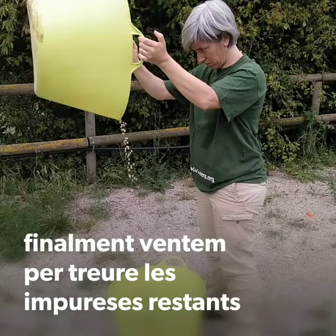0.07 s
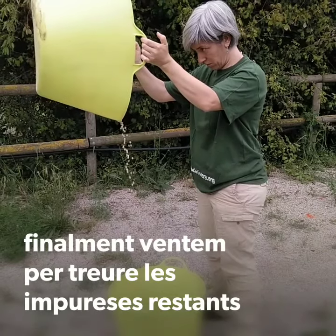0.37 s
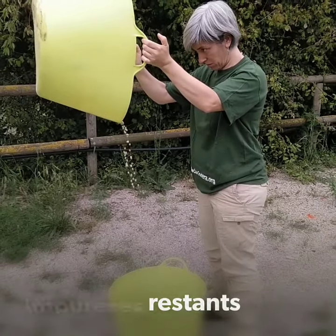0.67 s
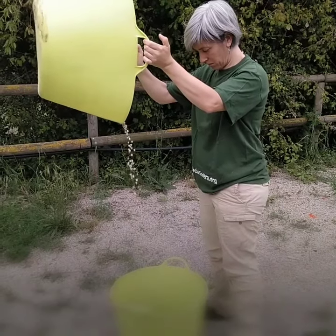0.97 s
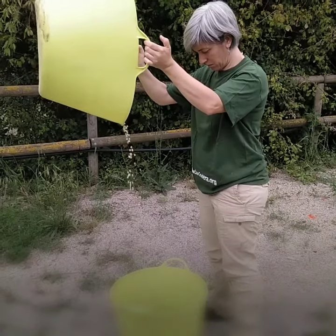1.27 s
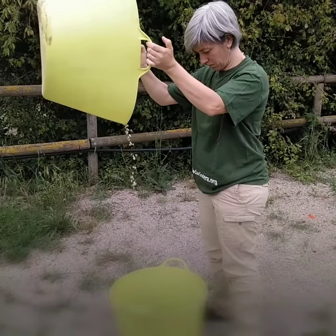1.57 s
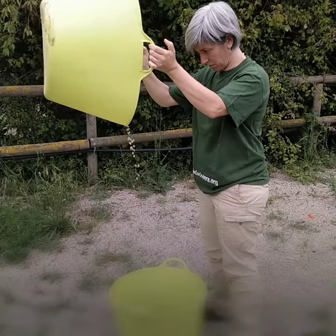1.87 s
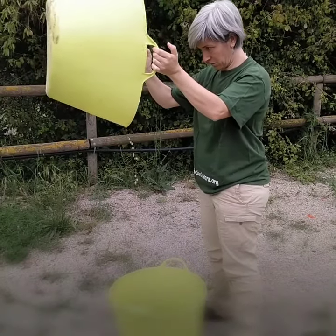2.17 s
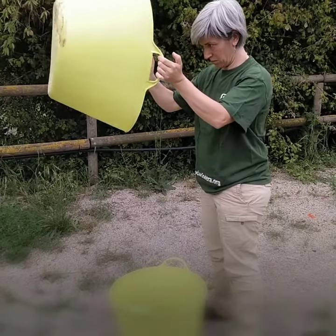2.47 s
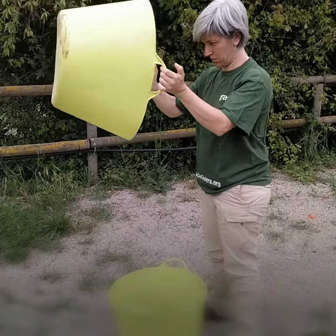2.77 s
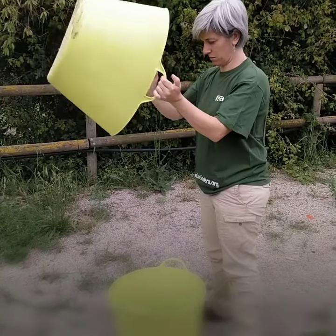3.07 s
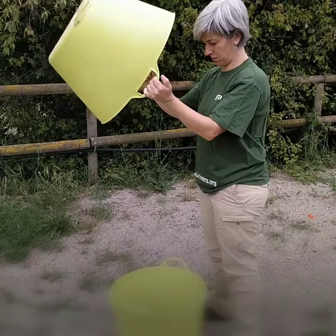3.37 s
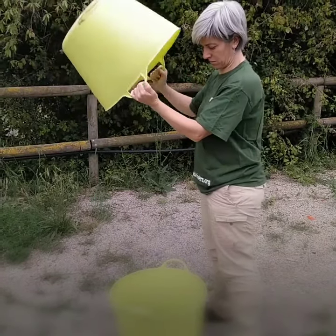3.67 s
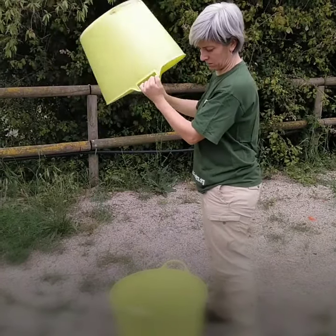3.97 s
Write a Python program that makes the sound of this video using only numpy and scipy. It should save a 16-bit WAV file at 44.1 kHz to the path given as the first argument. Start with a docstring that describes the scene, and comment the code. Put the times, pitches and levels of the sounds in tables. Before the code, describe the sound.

Dry seeds rattle into a plastic tub, thinning to clicks as a faint bird chirps.

```python
"""Seeds poured into a plastic tub

Outdoors, close to a stereo microphone, dry seeds fall in a thin stream into a soft plastic tub; each ticks on
the wall and thumps the hollow. The stream thins to single bouncing seeds and stops. Farther off to the right a
small bird calls from the hedge, over quiet open air; a soft rustle follows as the tub is tipped up."""
import sys
import numpy as np
from scipy import signal
from scipy.fft import rfft, irfft, next_fast_len
from scipy.io import wavfile
from scipy.ndimage import map_coordinates

SR = 44100
rng = np.random.default_rng(int(sys.argv[2]) if len(sys.argv) > 2 else 0)


def log_audio(samples):
    """Write samples as a 16-bit WAV file to the path given in sys.argv[1]."""
    # one column per channel
    frames = np.atleast_2d(samples).T
    # limit to full scale, then quantise
    limited = np.clip(frames, -1, 1)
    pcm = np.round(limited * 32767).astype(np.int16)
    wavfile.write(sys.argv[1], SR, pcm)


N = 176400
FULL_DB = -15  # the level that counts as full flow
THUMP_HZ = 480  # the tub's hollow sounds below this


def amp(db):
    """Decibels to gain."""
    return 10 ** (np.asarray(db) / 20)


def unit(x):
    """Scaled to rms 1."""
    return x / np.sqrt(np.mean(x ** 2) + 1e-20)


def along(points, hz):
    """Reads (frequency, value) points along a log frequency axis."""
    f, v = np.transpose(points)
    return np.interp(np.log(hz + 1), np.log(f + 1), v)


def freqs(size):
    """Frequencies of a real transform."""
    return np.fft.rfftfreq(size, 1 / SR)


def add(track, s, sound):
    """Lays a sound into a track at s seconds."""
    part = track[..., max(round(s * SR), 0):][..., :sound.shape[-1]]
    part += sound[..., :part.shape[-1]]


def sides(db):
    """Left and right gains for a left-minus-right level."""
    return amp(db * np.array([[.5], [-.5]]))


def bass(x, corner_hz):
    """The part of a sound below a corner frequency."""
    size = next_fast_len(N + SR // 2)
    return irfft(rfft(x, size) / (1 + (freqs(size) / corner_hz) ** 4), size)[..., :N]


def noise_pair(likeness, size):
    """Spectra of two white noises with the given left-right correlation."""
    turn = np.arccos(np.clip(along(likeness, freqs(size)), -1, 1)) / 2
    mid, side = rfft(rng.standard_normal((2, size))) * [np.cos(turn), np.sin(turn)]
    return np.array([mid + side, mid - side])


def causal(gains):
    """Minimum-phase response with these gains."""
    cepstrum = irfft(np.log(gains))
    half = cepstrum.shape[-1] // 2
    cepstrum[..., 1:half] *= 2
    cepstrum[..., half + 1:] = 0
    return np.exp(rfft(cepstrum))


def hiss(spectrum):
    """Diffuse stereo noise of rms 1, leaning to the right."""
    # how alike the air is on both sides (frequency [Hz], correlation [-1..1])
    likeness = [(60, 0.78), (600, 0.41), (3000, .1)]
    # its lean (frequency [Hz], left minus right [dB])
    balance = [(200, 0), (550, -1), (1650, -3), (5000, -3.5), (15000, 0)]
    hz = freqs(N)
    coloured = noise_pair(likeness, N) * amp(along(spectrum, hz))
    return unit(irfft(coloured * sides(along(balance, hz)), N))


def open_air():
    """Quiet, steady air all round the microphone."""
    # colour of the air (frequency [Hz], relative level [dB])
    spectrum = [(25, -9), (75, 3), (148, -8.5), (400, -6), (900, -3.5), (1250, -9.5), (1700, -9.5),
                (2230, -1), (3720, -8.5), (4620, -4.5), (6380, -13.5), (8000, -19), (12800, -28),
                (15500, -33.5)]
    return amp(-56.5) * hiss(spectrum)


def rustle(peak_s=3.67, width_s=.11, peak_db=-53):
    """A soft, brief rustle as the tub is tipped up after the pour ends."""
    # colour of the rustle (frequency [Hz], relative level [dB])
    spectrum = [(100, -17), (350, -6), (750, 1), (1500, -7), (3500, 3), (6500, -9.5), (10000, -17.5),
                (15000, -21.5)]
    swell = np.exp(-.5 * ((np.arange(N) / SR - peak_s) / width_s) ** 2)
    return amp(peak_db) * swell * hiss(spectrum)


def hedge(x):
    """Diffuse echo from the hedge and fence; the leaves return little bass."""
    # how long the echo lasts (frequency [Hz], t60 [s])
    decay = [(200, .2), (1000, 0.88), (3300, 0.69), (4700, .5), (8000, 0.09), (15000, 0.14)]
    hz, t, noise = signal.stft(rng.standard_normal((2, SR // 2)), SR, nperseg=256)
    tail = signal.istft(noise * amp(-60 * t / along(decay, hz)[:, None]), SR, nperseg=256)[1]
    reflected = np.atleast_2d(x - bass(x, corner_hz=390))
    return signal.fftconvolve(reflected, tail / np.linalg.norm(tail[0]), axes=1)[:, :N]


def bird(flutter_hz=648, pitch_depth=.065, rasp_depth=.38):
    """A small bird's short raspy glides, fluttering at random in pitch and level."""
    # its notes (time [s], length [s], start pitch [Hz], end pitch [Hz], level [dB], roughness [0..1])
    notes = [(3.072, 0.035, 9100, 7200, -54, .3), (3.523, 0.024, 4340, 4570, -52, 0.5),
             (3.532, 0.051, 4650, 4640, -52, 0.15), (3.547, 0.026, 4290, 3930, -49, 1),
             (3.577, 0.05, 3660, 3070, -46, .8), (3.598, .085, 4680, 4710, -59, 0.07),
             (3.665, .036, 4980, 5120, -55.5, .3), (3.706, 0.029, 3250, 3350, -50.5, 0.52),
             (3.716, .02, 4420, 4170, -54, 1), (3.732, .07, 4720, 4660, -66, .12),
             (3.743, .02, 3200, 3100, -55, .9), (3.938, 0.018, 6900, 7950, -65, 0.5),
             (3.984, .018, 7000, 7850, -61, 0.7)]
    out = np.zeros(N)
    for s, length, start_hz, end_hz, db, rough in notes:
        u = np.linspace(0, 1, round(length * SR))
        flutter, rasp = (map_coordinates(knots, [u * length * flutter_hz], mode="mirror")
                         for knots in rng.standard_normal((2, 64)))
        hz = (start_hz + (end_hz - start_hz) * u) * (1 + rough * pitch_depth * flutter)
        envelope = np.sqrt(np.abs(np.sin(np.pi * u))) * (1 + rough * rasp_depth * rasp)
        add(out, s, amp(db) * unit(envelope * np.sin(2 * np.pi * np.cumsum(hz) / SR)))
    return out


def tub_ticks(contact_hz, lift_db, thump_db=0, size=4096):
    """One stereo tick of unit energy per contact pitch: a crack, then a short ring in the tub."""
    # colour of a seed on the tub (frequency [Hz], relative level [dB])
    colour = [(30, -30.5), (72, -17.5), (115, -26.5), (140, -15), (158, -9.5), (178, 3.5), (195, -0.5),
              (213, 8.5), (240, 0), (268, 3.5), (290, -1), (320, 2), (400, -1), (470, -5), (530, 2),
              (610, -4.5), (700, -1.5), (790, 4), (920, 3.5), (1050, -1.5), (1380, 3), (1700, -3.5),
              (1900, 1), (2050, 6), (2400, 6), (3000, 2), (3600, 0.5), (3850, -2), (5400, -.5), (7000, -5),
              (9200, -5), (11500, -18), (14000, -15), (15500, -25)]
    # how long the tub rings (frequency [Hz], t60 [s])
    ring_times = [(80, 0.17), (210, 0.046), (500, 0.026), (820, 0.038), (1400, 0.027), (2250, 0.024),
                  (4000, 0.026), (9000, 0.037), (15000, 0.041)]
    # how alike it is on both sides (frequency [Hz], correlation [-1..1])
    likeness = [(60, 0.84), (160, 0.95), (270, 1), (450, 0.91), (1220, 0.84), (2100, 0.94), (3300, 0.48),
                (4500, -0.15), (9000, 0.046), (13000, 0.22)]
    # where it sounds from (frequency [Hz], left minus right [dB])
    balance = [(140, 0), (330, -1), (500, -3), (770, 2), (1170, 0), (1800, -2.5), (2700, -4.5), (3900, -6),
               (5400, 1.5), (7000, -4), (8600, -7), (10500, 0), (15000, .5)]
    attack_s, crack_s, lift_octaves = .00037, .00094, .34
    hz, t = freqs(size), np.arange(size) / SR
    centres, t60 = np.transpose(ring_times)
    bands = np.array([along(np.c_[centres, one], hz) for one in np.eye(len(centres))])
    crack_db = -4.5 + 2 * np.maximum(np.log2(centres / 3000), 0)  # stands out more above 3 kHz
    crack = amp(crack_db)[:, None] * np.exp(-t / crack_s)
    envelopes = (amp(-60 * t / t60[:, None]) + crack) * (1 - np.exp(-t / attack_s))
    envelopes /= np.linalg.norm(envelopes, axis=1, keepdims=True)
    tub_db = along(colour, hz) + thump_db / (1 + (hz / THUMP_HZ) ** 2)
    placement = causal(sides(along(balance, hz)))
    ticks = []
    for pitch in contact_hz:
        lift = lift_db * np.exp(-.5 * (np.log2((hz + 1) / pitch) / lift_octaves) ** 2)
        ring = (irfft(noise_pair(likeness, size)[:, None] * bands) * envelopes).sum(axis=1)
        tick = irfft(rfft(ring) * causal(amp(tub_db + lift)) * placement)
        ticks.append(unit(tick) / np.sqrt(size))
    return ticks


def strikes(dull_hz=1600, bounce_s=.02, bounce_db=-22):
    """Single seeds hit bare plastic and bounce once; duller, harder hits thump the hollow more."""
    # seeds that strike hard (time [s], level [dB], contact pitch [Hz])
    hits = [(.168, -15, 2700), (0.4008, -17, 2600), (0.8721, -19, 9000), (0.9063, -17, 2200),
            (0.9915, -17.5, 7800), (1.1793, -14.5, 2090), (1.3687, -21, 5500), (1.4578, -13, 2400),
            (1.635, -14, 2100), (1.703, -24, 2100), (1.722, -13, 8100), (2.214, -19, 2500),
            (2.2388, -12.5, 2300), (2.2617, -21, 2400), (2.2704, -11, 2380), (2.286, -19, 2300),
            (2.301, -13.5, 2900), (2.314, -12, 2090), (2.336, -12.5, 2300), (2.362, -12.5, 2050),
            (2.3795, -12, 1950), (2.4064, -14.5, 2500), (2.415, -13, 2300), (2.421, -13.5, 5600),
            (2.4362, -14, 3600), (2.4406, -12, 2500), (2.451, -15, 2300), (2.46, -13.5, 2900),
            (2.4672, -12.5, 3930), (2.479, -13.5, 2400), (2.5103, -9, 2180), (2.518, -14, 2300),
            (2.5584, -13.5, 1930), (2.568, -11, 1940), (2.576, -18, 2880), (2.5841, -14.5, 7060),
            (2.6, -13.5, 2300), (2.609, -21, 3100), (2.617, -14, 5770), (2.625, -21, 2600),
            (2.6646, -19, 2300), (2.674, -19.5, 1200), (2.679, -21, 2300), (2.6896, -16, 4000),
            (2.694, -24, 2400), (2.707, -18.5, 1260), (2.721, -24, 2500), (2.727, -21.5, 2910),
            (2.76, -21.5, 3900), (2.765, -24, 4500), (2.776, -25, 3100), (2.784, -30, 8000),
            (2.791, -19.5, 3800), (2.8, -24, 2300), (2.805, -22, 5300), (2.815, -33.5, 3700),
            (2.827, -33, 2400), (2.8442, -23, 3650), (2.856, -30, 3020), (2.866, -33, 2440),
            (2.8865, -26, 5200), (2.892, -29, 4300), (2.9083, -32.5, 2500), (2.916, -29, 1300),
            (2.924, -34.5, 3400), (2.9303, -23.5, 3900), (2.9525, -22, 1280), (2.9697, -28, 4970),
            (2.976, -30, 4700), (2.993, -31, 5030), (2.999, -26.5, 4100), (3.0376, -27.5, 3420),
            (3.055, -38, 2100), (3.065, -31, 1300), (3.098, -31, 4100), (3.1247, -27, 8950),
            (3.135, -35, 2000), (3.156, -40.5, 2360), (3.17, -37, 5000), (3.216, -48.5, 1270),
            (3.2593, -45, 3700), (3.3233, -49.5, 4230), (3.355, -53, 6440), (3.488, -38, 3900),
            (3.622, -44.5, 4500), (3.876, -49, 4740)]
    out = np.zeros((2, N))
    for s, db, contact_hz in hits:
        octaves_above_dull = max(np.log2(contact_hz / dull_hz), 0)
        thump_db = -4.5 * octaves_above_dull + .21 * (db - FULL_DB)
        first, bounce = tub_ticks([contact_hz] * 2, lift_db=4.5, thump_db=thump_db)
        gain = amp(db) * np.sqrt(.0064 * SR)  # the energy of 6.4 ms at this level
        add(out, s, gain * first)
        add(out, s + bounce_s * rng.uniform(.35, 2.9), gain * amp(bounce_db) * bounce)
    return out


def stream(full_seeds_per_s=850, size_spread_db=3.5, scatter_s=.012, typical_hz=3470, spots=64):
    """Seeds of random size slide evenly off the rim and land, early or late, on many spots."""
    # the course of the pour (time [s], level [dB])
    pour = [(0, -13.5), (.6, -14), (1.05, -13.5), (1.5, -13.5), (1.88, -14), (2.132, -15.5), (2.221, -18),
            (2.32, -18.5), (2.4, -22), (2.471, -18.5), (2.54, -25.5), (2.62, -25.5), (2.73, -30.5),
            (2.86, -38.5), (2.97, -40.5), (3.04, -47), (3.15, -48.5), (3.21, -53.5), (3.3, -57.5),
            (3.45, -79)]
    t = np.arange(N) / SR
    flow = amp(np.interp(t, *np.transpose(pour)) - FULL_DB)
    rate = full_seeds_per_s * flow ** .62  # less flow means fewer, softer seeds
    departures = np.flatnonzero(np.diff(np.floor(np.cumsum(rate) / SR)))
    size, scatter = rng.standard_normal((N, 2))[:len(departures)].T
    seed_gain = flow * amp(FULL_DB) * np.sqrt(SR / rate)
    blows = unit(amp(size_spread_db * np.minimum(size, 2))) * seed_gain[departures]
    landings_s = np.abs(t[departures] + scatter_s * scatter)
    ticks = tub_ticks(typical_hz * np.exp(.78 * np.linspace(-2, 2, spots)), lift_db=6)
    out = np.zeros((2, N))
    for s, blow, spot in zip(landings_s, blows, rng.integers(spots, size=N)):
        add(out, s, blow * ticks[spot])
    return out - (1 - flow ** .23) * bass(out, THUMP_HZ)  # a trickle booms less


def scene(bird_pan_db=-5.5, bird_echo_db=-6.5, tub_echo_db=-14.5):
    """Seeds close to the microphone, the bird farther off to the right, open air behind."""
    seeds = stream() + strikes()
    song = bird()
    far_bird = sides(bird_pan_db) * (song + amp(bird_echo_db) * hedge(song))
    near_tub = seeds + amp(tub_echo_db) * hedge(seeds)
    return near_tub + far_bird + rustle() + open_air()


def record(dry):
    """The recorder rounds off peaks near full scale and keeps nothing above its band limit."""
    knee, top_hz = 13, 15600
    rounded = dry / (1 + np.abs(dry) ** knee) ** (1 / knee)
    size = next_fast_len(N + SR // 2)
    return irfft(rfft(rounded, size) * (freqs(size) < top_hz), size)[:, :N]


dry = scene()
out = record(dry)
log_audio(out)
```